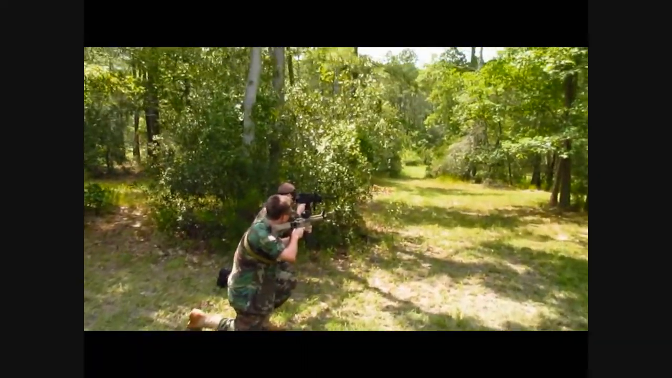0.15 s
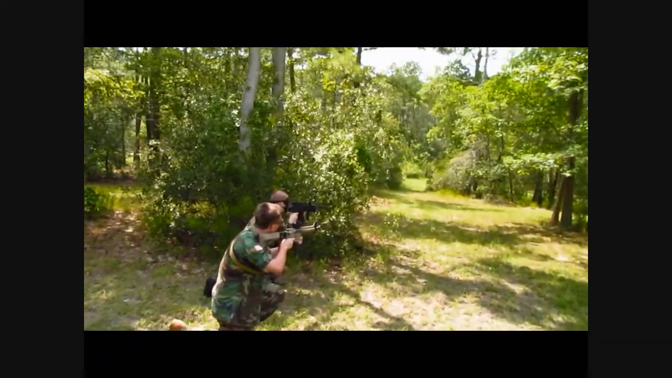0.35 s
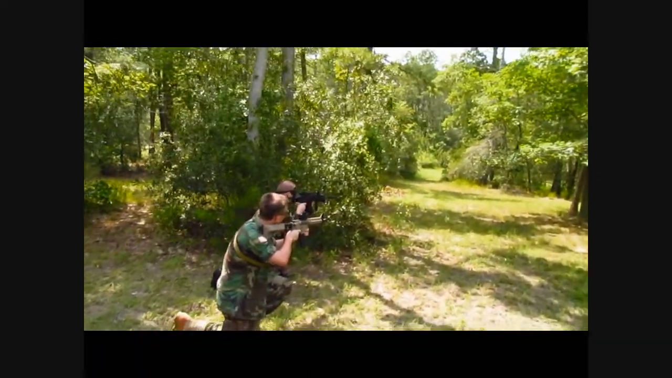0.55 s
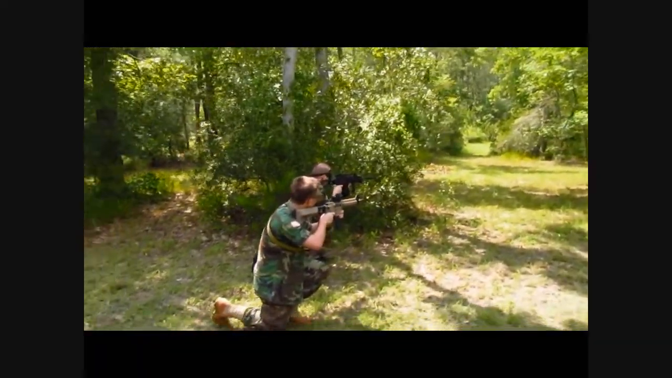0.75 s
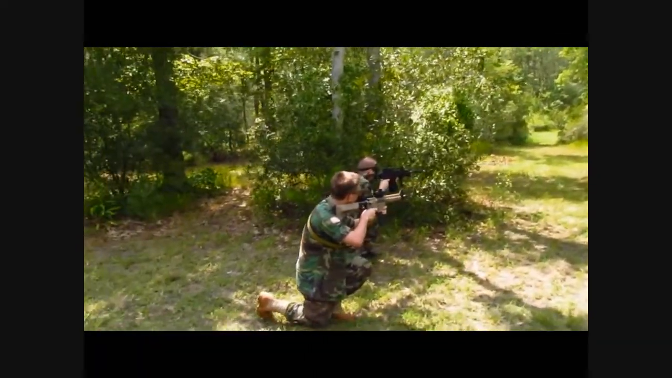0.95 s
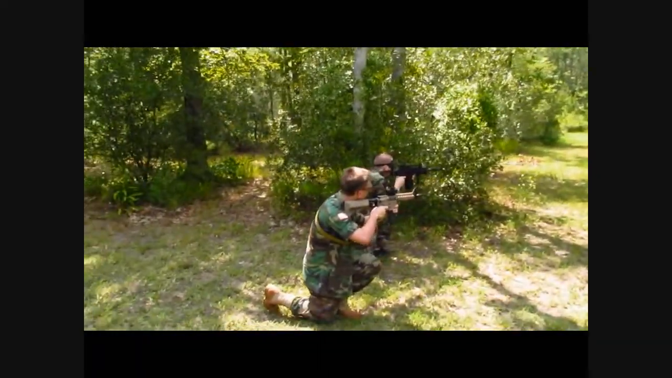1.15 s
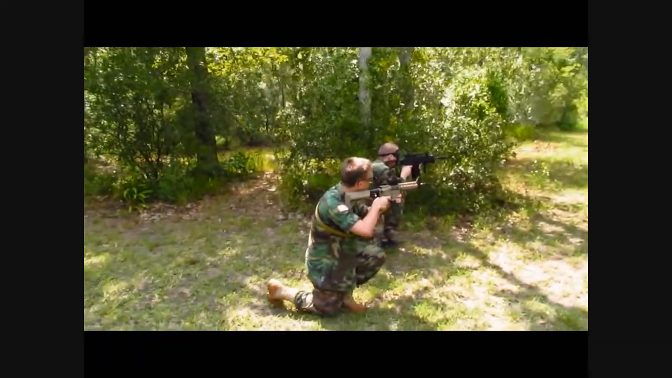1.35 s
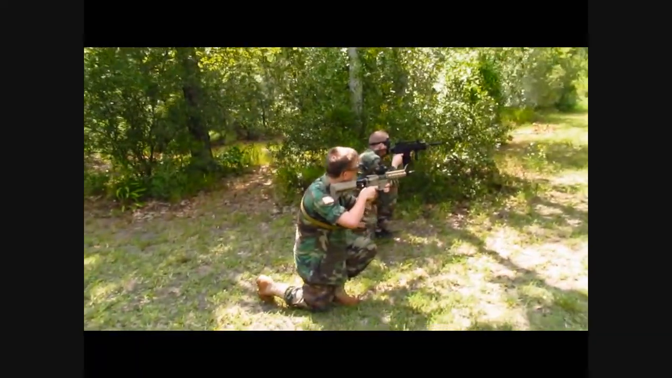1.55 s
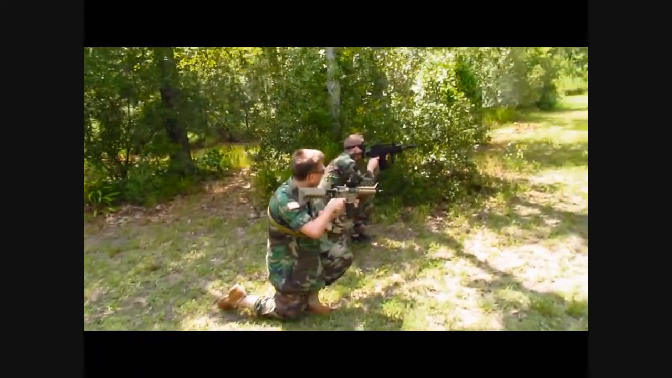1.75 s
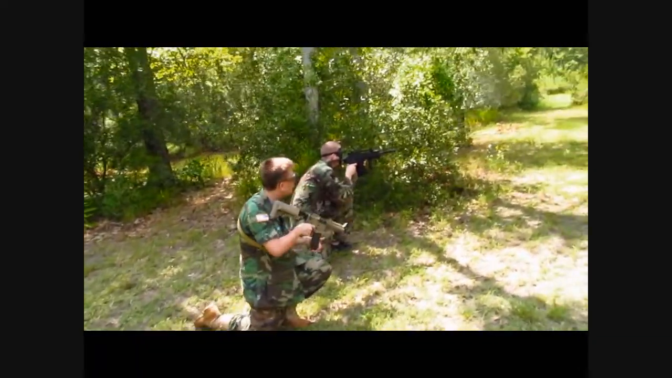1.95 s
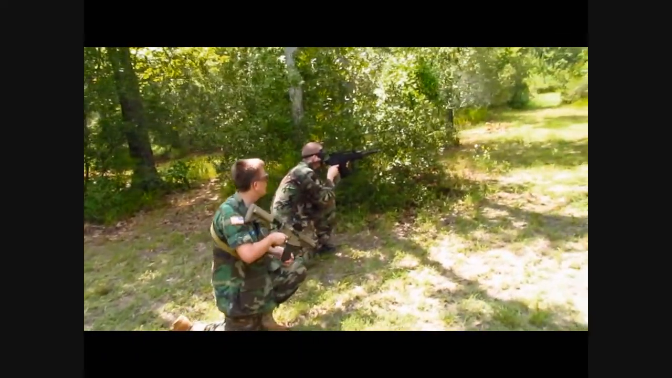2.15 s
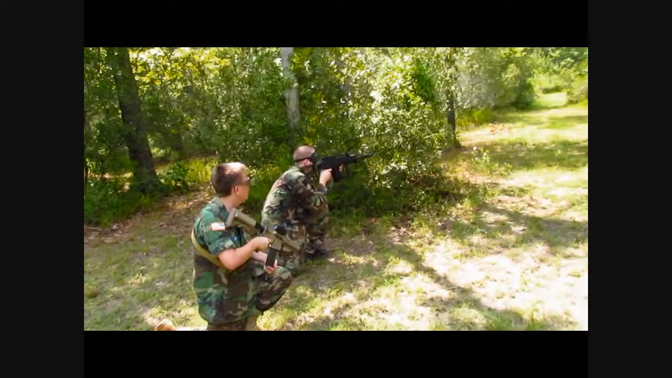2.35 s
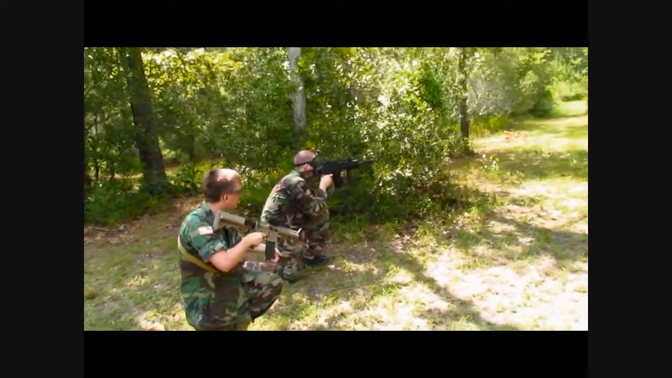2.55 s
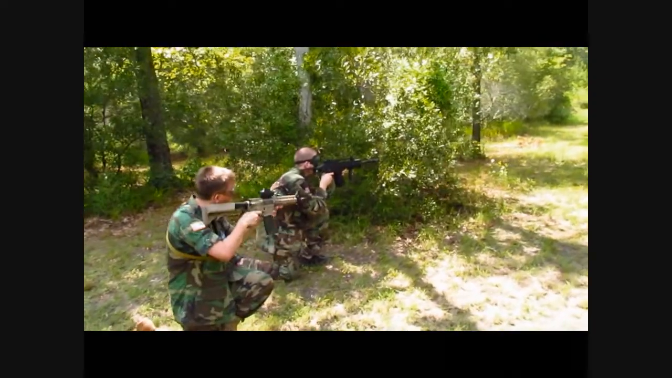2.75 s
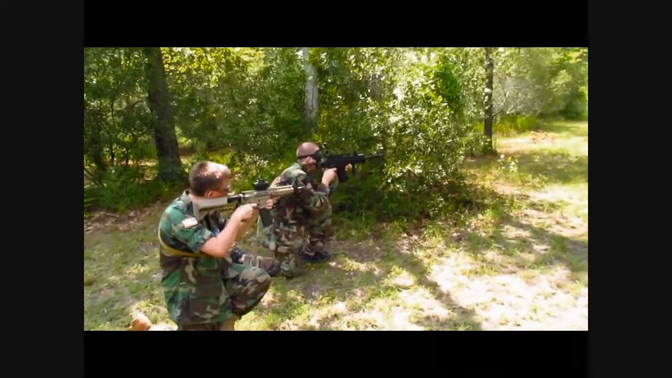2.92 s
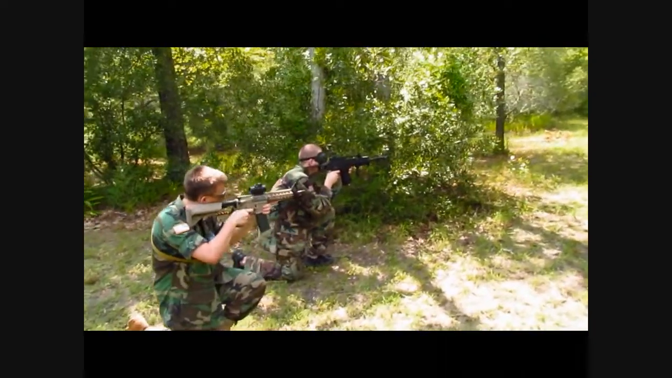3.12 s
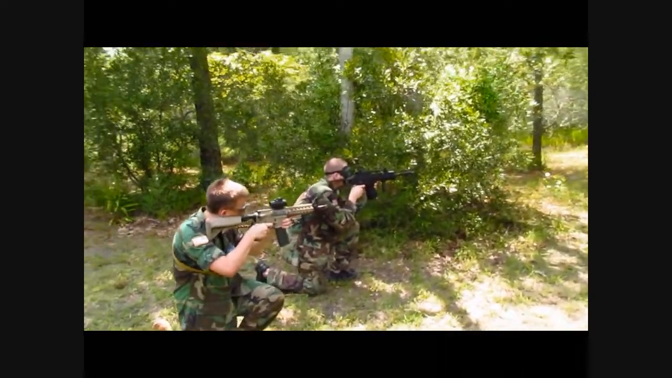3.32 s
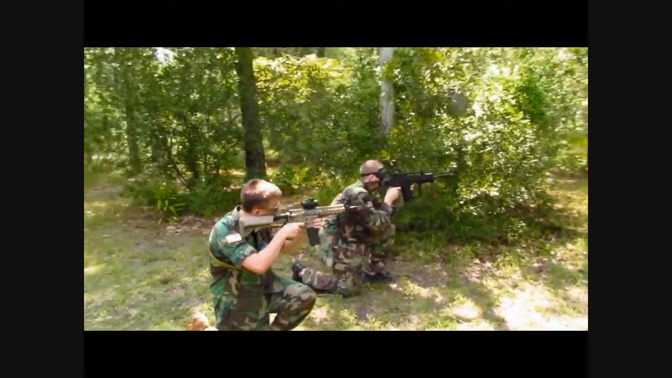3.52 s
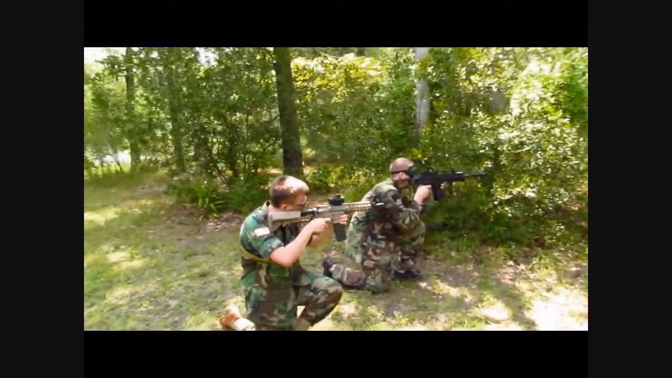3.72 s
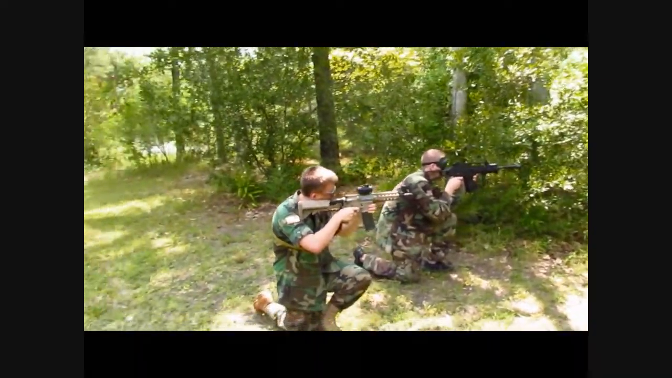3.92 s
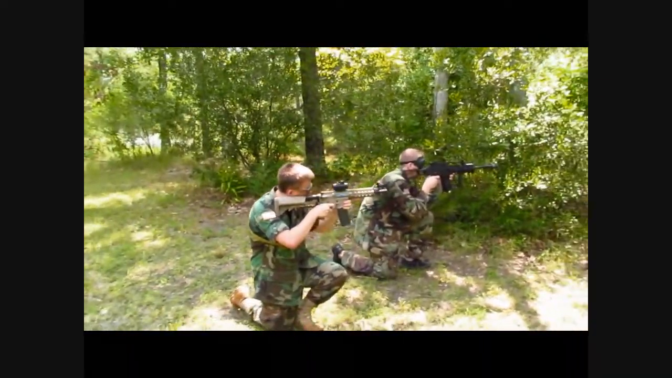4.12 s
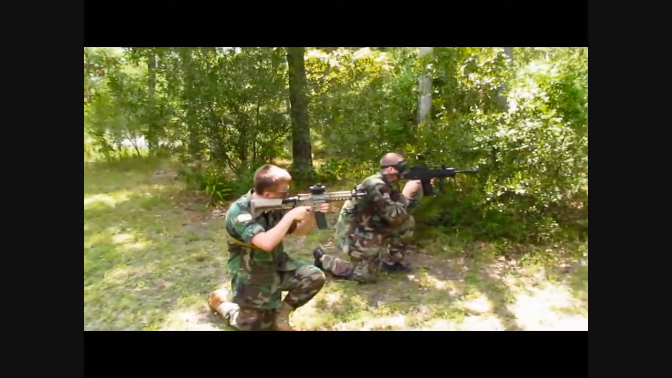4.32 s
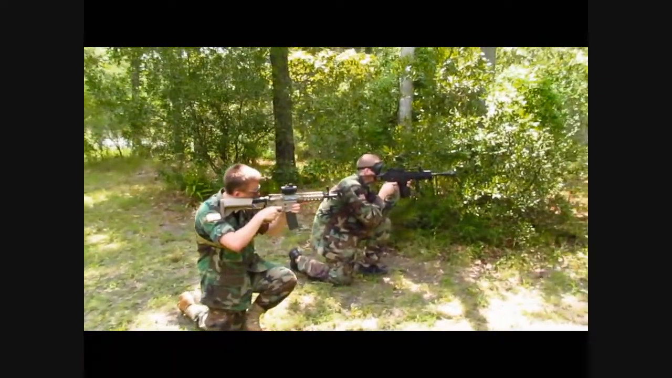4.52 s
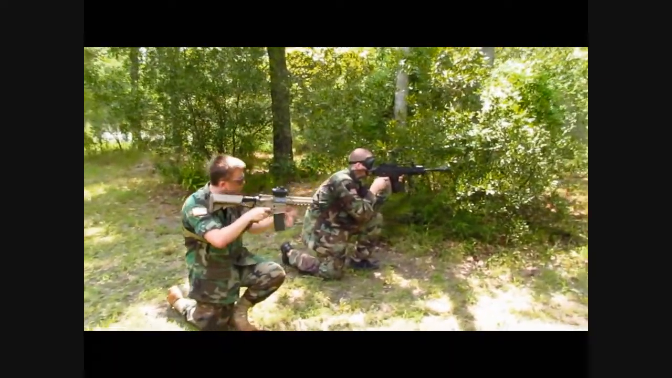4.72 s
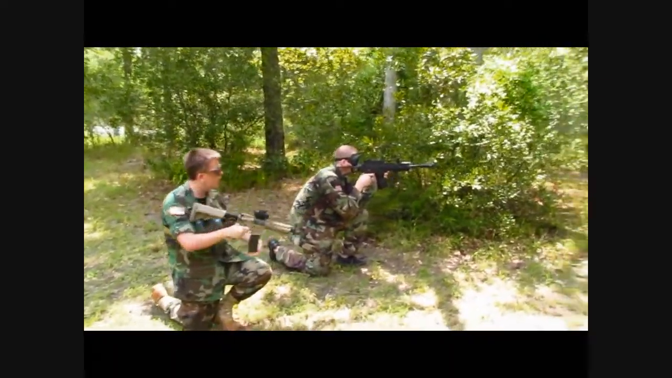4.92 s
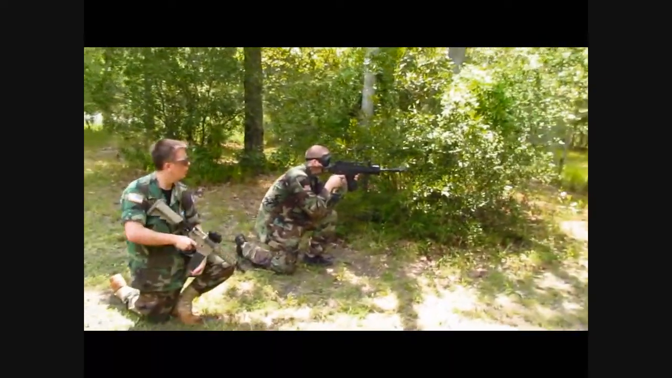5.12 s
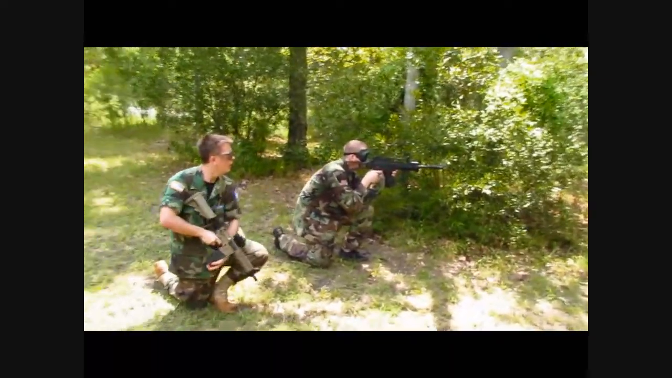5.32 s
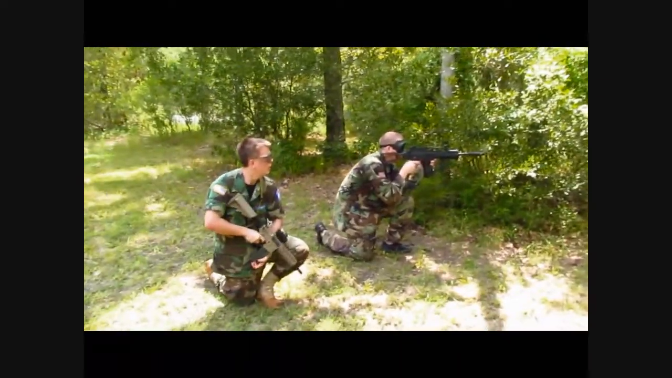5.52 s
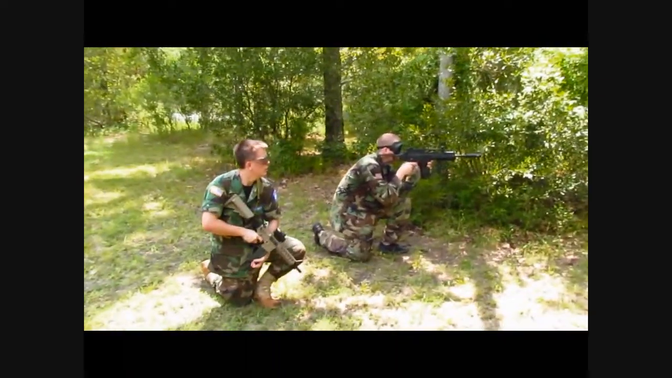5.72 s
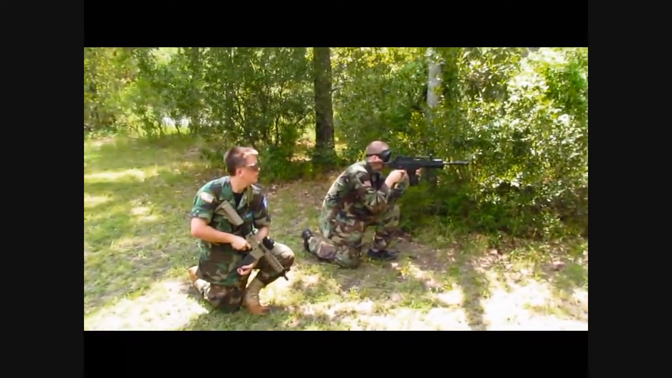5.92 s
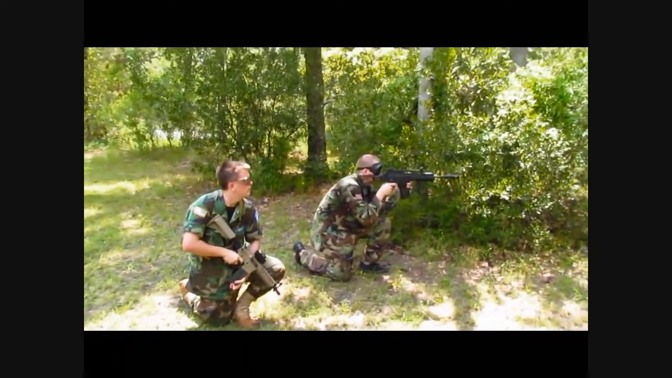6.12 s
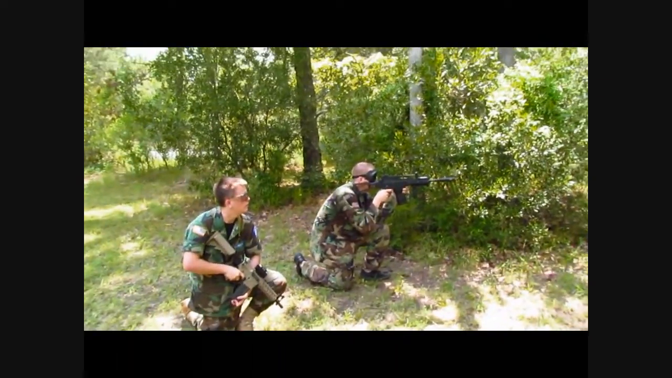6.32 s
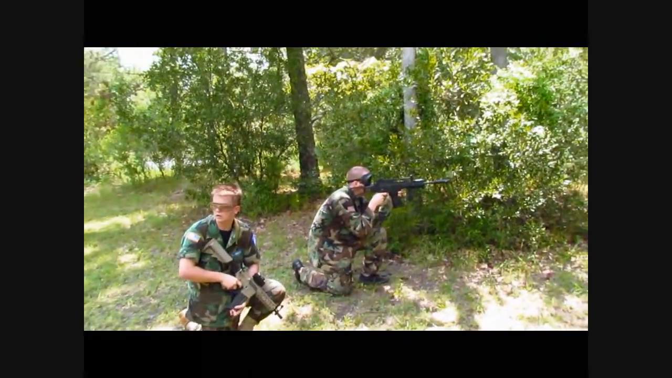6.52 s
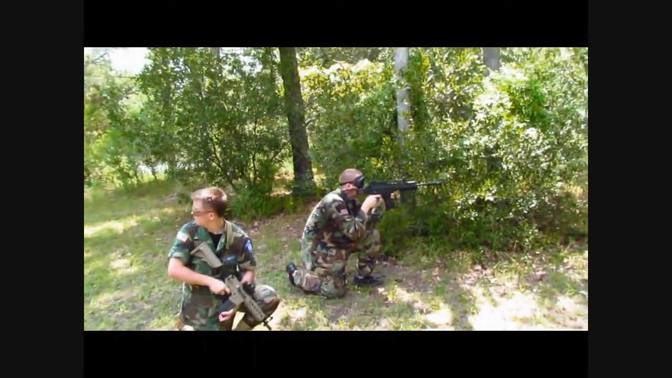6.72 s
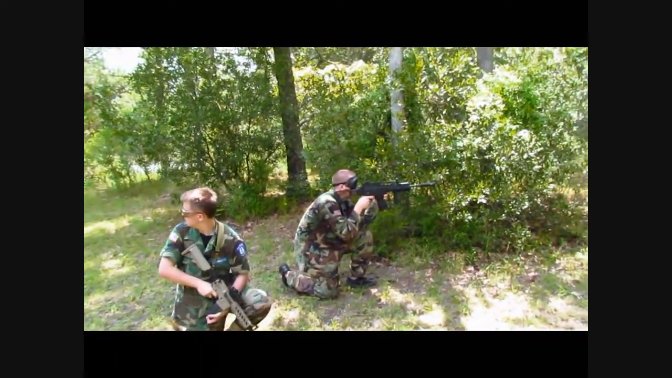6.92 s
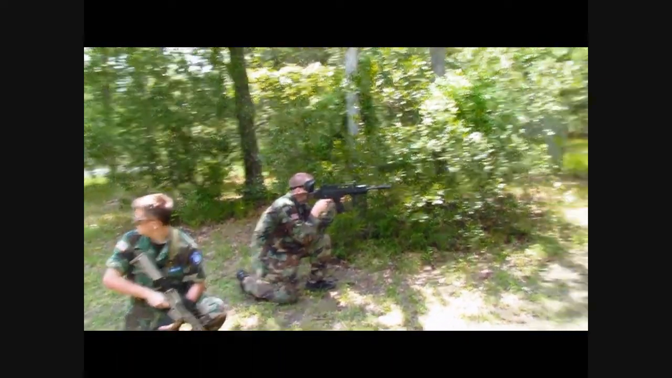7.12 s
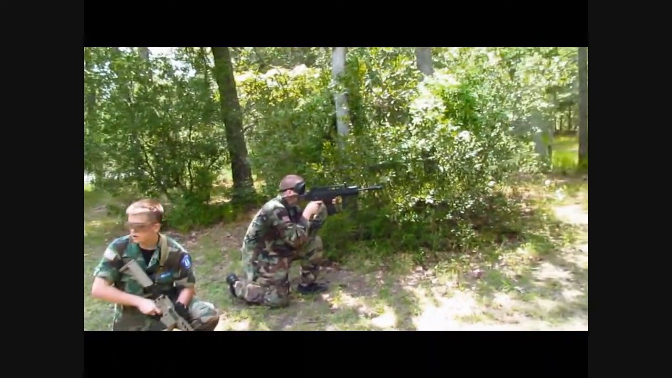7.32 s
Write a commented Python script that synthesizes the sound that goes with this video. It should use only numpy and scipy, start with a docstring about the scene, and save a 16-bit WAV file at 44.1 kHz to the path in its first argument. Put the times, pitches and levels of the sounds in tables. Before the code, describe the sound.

A close electric airsoft rifle opens with a rapid automatic burst, gears whining under the snapping shots, while a second fires single pops. A third answers with a short run from farther off. Another automatic burst follows, then spaced single shots and light ticks of handled gear. The microphone is near the shooters at the edge of a wood, with a short echo, faint leaves and a distant engine.

```python
"""The edge of a wood, with three electric airsoft rifles heard on one microphone.
Close by, one fires two automatic bursts and another fires single shots; a third answers farther off.
In each shot a gear train whines as it cocks the spring, the piston slams home and air pops from the
muzzle. The trees scatter a short echo and kit ticks as a rifle is lowered. Behind it all, leaves hiss
and an engine drones far away."""
import sys
import numpy as np
from scipy import signal
from scipy.fft import rfft, irfft, next_fast_len
from scipy.io import wavfile
from scipy.ndimage import map_coordinates

SR = 44100
rng = np.random.default_rng(int(sys.argv[2]) if len(sys.argv) > 2 else 0)


def wrap_up_sound(samples):
    """Save the sound to the file named by the first command line argument, as 16-bit audio."""
    columns = np.atleast_2d(samples).T
    # keep every value between -1 and 1, then stretch to whole-number steps
    tamed = np.clip(columns, -1, 1)
    steps = np.round(tamed * 32767).astype(np.int16)
    wavfile.write(sys.argv[1], SR, steps)


N = 324645
TOP_HZ = 10890  # upper edge of the microphone's band

# spectrum of the air leaving a muzzle: frequency_hz, level_db
POP_SPECTRUM = [(40, -21.5), (200, -24), (800, -3.5), (1500, -10), (2900, -4.5), (4100, 2), (5400, -3),
                (6800, -4.5), (10500, -6)]
# spectrum of a small hard part ticking: frequency_hz, level_db
TICK_SPECTRUM = [(100, -13), (1000, -13), (3500, -7), (7000, -2.5), (10500, -0.5)]
# spectrum of a knock on the near single-shot rifle: frequency_hz, level_db
SINGLE_CASE_SPECTRUM = [(40, -13), (300, -15.5), (700, 0), (1500, -0.5), (2400, -0.5), (4300, -11),
                        (6000, -5), (8000, 1), (10500, -5)]
# body resonances of that rifle: pitch_hz, level_db, t60_s
SINGLE_BODY_MODES = [(507, -15.5, 0.064), (643, -6.5, 0.041), (811, -5.5, 0.038), (980, -6.5, 0.04),
                     (1396, -10, 0.042), (2224, -0.5, 0.032), (3200, 1.5, 0.018), (3624, 0, 0.023),
                     (5060, 1, 0.023), (6220, -5.5, 0.04), (7600, -22.5, .03)]
# rise and fall of the background: time_s, leaves_db, engine_rumble_db
BACKGROUND_LEVELS = [(0, -69, -58), (2.6, -47, -71), (4.85, -55.5, -75), (5.25, -56.5, -73),
                     (5.7, -56.5, -68.5), (6.5, -53.5, -63), (6.85, -52, -58), (7.36, -47, -57)]


def amp(db):
    """Decibels to gain."""
    return 10 ** (np.asarray(db) / 20)


def unit(x):
    """Scale to rms 1."""
    return x / np.sqrt(np.mean(x ** 2) + 1e-20)


def ease(u):
    """A smooth step from 0 to 1 as u goes from 0 to 1."""
    return np.sin(np.pi / 2 * np.clip(u, 0, 1)) ** 2


def along(points, hz):
    """Read (frequency_hz, value) points at hz, on a log axis."""
    knots_hz, values = np.transpose(points)
    return np.interp(np.log(hz + 1), np.log(knots_hz + 1), values)


def curves(rows, t):
    """Each column after the first, read at times t."""
    times, *columns = np.transpose(rows)
    return [np.interp(t, times, column) for column in columns]


def add(track, start_s, sound):
    """Mix a sound into the track from start_s."""
    i = round(start_s * SR)
    part = sound[max(-i, 0):max(N - i, 0)]
    track[max(i, 0):][:len(part)] += part


def wobble(rate, size):
    """A smooth random curve, rate knots a second."""
    at = np.arange(size) * rate / SR
    return map_coordinates(rng.standard_normal(int(at[-1]) + 4), [at])


def noise(spectrum, size):
    """Coloured noise of rms 1."""
    padded = next_fast_len(size)
    colour = amp(along(spectrum, np.fft.rfftfreq(padded, 1 / SR)))
    return unit(irfft(rfft(rng.standard_normal(padded)) * colour, padded)[:size])


def click(spectrum, scatter_db, spread_s=0.000254, size=1024):
    """A sharp impulse smeared by the parts it passes through; its energy is that of 1 ms at rms 1."""
    hz = np.fft.rfftfreq(size, 1 / SR)
    tint = np.interp(hz, np.linspace(0, SR / 2, num=40), rng.standard_normal(40))
    cepstrum = irfft(np.log(amp(along(spectrum, hz) + scatter_db * tint)))
    cepstrum[1:size // 2] *= 2  # minimum phase: the energy comes at the front
    cepstrum[size // 2 + 1:] = 0
    delay_s = spread_s * np.abs(wobble(91.4, size)[:len(hz)])  # each band takes its own path
    pulse = irfft(np.exp(rfft(cepstrum) - 2j * np.pi * np.cumsum(delay_s) * hz[1]))
    return pulse / np.linalg.norm(pulse) * np.sqrt(SR / 1000)


def clatter(spectrum, t60_s, rise_s, size=5000):
    """A puff of noise that swells and dies."""
    t = np.arange(size) / SR
    return noise(spectrum, size) * amp(-60 * t / t60_s) * (1 - np.exp(-t / rise_s))


def ring(modes, detune, size=5000):
    """The modes of a rifle part, struck at slightly new strengths and pitches each time."""
    t = np.arange(size) / SR
    hz, db, t60_s = np.transpose(modes)[:, :, None]
    strength, shift = rng.standard_normal((2, len(modes), 1))
    waves = np.sin(2 * np.pi * hz * (1 + detune * shift) * t)
    decays = amp(db + 1.3 * strength - 60 * t / t60_s)
    return np.sum(decays * waves, axis=0) * (1 - np.exp(-t / 0.0012))


def gear_train(tooth_hz, whine, grind, whine_db, jitter):
    """Meshing teeth whine over a grinding that pulses with each tooth; uneven teeth roughen the tone."""
    # how strongly the gearbox radiates a whine line: frequency_hz, gain_db
    gearbox_response = [(500, -38), (780, -15), (870, -0.5), (1020, -36), (1180, -4.5), (1350, 0),
                        (1550, -8.5), (1790, 6.5), (2150, 2), (2650, 0.5), (3300, -6), (4500, 2.5),
                        (8000, 0)]
    size = len(tooth_hz)
    phase = 2 * np.pi * np.cumsum(tooth_hz * (1 + jitter * wobble(500, size))) / SR
    lines = 0
    for multiple, db in whine:
        flutter_db = 2 * wobble(150, size)
        line_db = db + along(gearbox_response, multiple * tooth_hz) + flutter_db
        lines += amp(line_db) * np.sin(multiple * phase + rng.uniform(0, 2 * np.pi))
    grinding = noise(grind, size)
    tooth_pulses = unit((1 + .5 * np.cos(phase)) * amp(1.8 * wobble(350, size)))
    return grinding * tooth_pulses + amp(whine_db) * lines


def slam_times(first_s, count, period_s, spin_up_s, run_down_s):
    """A steady beat that drags as the battery tires, with optional lags at its start and end."""
    tiring_s, lag_left = .000058, .15  # per shot: added cycle time, share of spin-up lag that remains
    shot = np.arange(count - 1)
    gaps = period_s + tiring_s * shot + spin_up_s * lag_left ** shot
    gaps[-1] += run_down_s
    return first_s + np.r_[0, np.cumsum(gaps)]


def firing_cycle(times, t):
    """The spring drags the motor down until the piston is let go: tooth rate, load and mesh (0-1)."""
    pick_up, let_go, recover, take_hold = .33, .9, .09, .15  # shares of one cycle
    free_hz, sag_hz = 1366.4, 369.5  # tooth rate of free gears, and its fall under the full spring
    slams = np.r_[2 * times[0] - times[1], times, 2 * times[-1] - times[-2]]
    turn = np.interp(t, slams, np.arange(len(slams))) % 1
    squeeze = np.interp(turn, [pick_up, let_go], [0, 1])
    meshed = ease((turn - pick_up) / take_hold + 1) * ease((let_go - turn) / take_hold + .5)
    tooth_hz = free_hz - sag_hz * (squeeze + np.exp(-turn / recover))
    return tooth_hz, squeeze * meshed, meshed


def piston_rush(spectrum, thump_db, size=1764):
    """The released piston scrapes forward and kicks the stock; the slam falls at the centre."""
    # spectrum of the kick in the stock: frequency_hz, level_db
    thump_spectrum = [(25, 0.5), (110, -3.5), (230, 1.5), (420, 1.5), (900, -4.5), (4000, -58)]
    t = (np.arange(size) - size / 2) / SR
    scrape = noise(spectrum, size) * np.exp(-np.abs(t) / .002) * (t < 0)
    thump = noise(thump_spectrum, size) * np.exp(-(t / 0.0071) ** 2)
    return scrape + amp(thump_db) * thump


def burst(firing, loudness, whine, pop_delay_s, gear_db, whine_db, treble_db, ring_db, rattle_db):
    """Automatic fire: the gears run on while the piston slams, the muzzle pops and the rack is caught."""
    # spectra of the grinding gears, the piston's slam and loose parts: frequency_hz, level_db
    grind_spectrum = [(40, -41), (300, -14), (550, -13.5), (850, -5), (1150, -5.5), (2800, 2.5),
                      (4100, 1.5), (4950, 0.5), (5800, -0.5), (6800, 1.5), (8000, -1), (10500, -1)]
    slam_spectrum = [(30, -12), (150, -19.5), (1300, -14.5), (1900, -12), (3050, 2), (4000, -3),
                     (5200, -14), (7400, 0), (10500, -3)]
    rattle_spectrum = [(40, -26), (250, -12.5), (750, 4), (1800, -1), (3000, 1), (5200, -2), (7000, 0),
                       (10500, -2.5)]
    # resonances of the rifle body and the cylinder head: pitch_hz, level_db, t60_s
    body_modes = [(380, -22, 0.053), (621, -17, 0.068), (777, -9.5, 0.047), (1263, -8, 0.051),
                  (1510, -11.5, 0.048), (2453, -7, 0.035), (3043, -4, 0.04), (3580, -5, 0.025),
                  (6690, -2, 0.022)]
    head_modes = [(2860, -6.5, 0.022), (3100, -8, 0.019), (3410, -7, .02)]
    t = np.arange(N) / SR
    on_s, off_s, *beat = firing
    attack_s, release_db_per_s = 0.056, 360
    times = slam_times(*beat)
    tooth_hz, load, meshed = firing_cycle(times, t)
    motor = ease((t - on_s) / attack_s) * amp(-release_db_per_s * np.maximum(t - off_s, 0))
    grind = [(hz, db + treble_db * hz / TOP_HZ) for hz, db in grind_spectrum]
    # teeth that grip the rack and bear the spring sing more and grind less
    singing_db = whine_db + 12 * meshed + 6.5 * load
    gears = gear_train(tooth_hz, whine, grind, singing_db, jitter=.012)
    out = motor * amp(curves(loudness, t)[0] + gear_db - 4.5 * load) * gears
    body = ring(body_modes, detune=0.012)  # the same case answers every shot
    loose_parts = clatter(rattle_spectrum, t60_s=0.037, rise_s=0.0013)
    for s, (slam_scatter, pop_scatter) in zip(times, rng.standard_normal((len(times), 2))):
        level_db, pop_offset_db = curves(loudness, s)
        slam_db = level_db + 0.6 * slam_scatter
        pop_db = level_db + pop_offset_db + pop_scatter + 1.3
        rush = piston_rush(slam_spectrum, thump_db=-17.5)
        add(out, s - len(rush) / SR / 2, amp(slam_db - 8.5) * rush)
        add(out, s, amp(slam_db + 3.5) * click(slam_spectrum, scatter_db=0.9))
        add(out, s, amp(slam_db - 2.5) * ring(head_modes, detune=.006))
        add(out, s + pop_delay_s, amp(pop_db) * click(POP_SPECTRUM, scatter_db=2.5))
        add(out, s, amp(ring_db) * (body + 0.33 * ring(body_modes, detune=0.032)))
        rattle = loose_parts + .5 * clatter(rattle_spectrum, t60_s=.032, rise_s=.002)
        add(out, s + pop_delay_s, amp(rattle_db) * rattle)
        catch_db = -14.5 + 2 * rng.standard_normal()
        add(out, s + .0175, amp(catch_db) * clatter(TICK_SPECTRUM, t60_s=0.01, rise_s=0.0011))
    return out


def automatic_rifle():
    """Close to the microphone, the motor drives the piston through two long bursts."""
    # timing of each burst:
    # motor_on_s, motor_off_s, first_slam_s, shot_count, period_s, spin_up_lag_s, run_down_lag_s
    first_firing = (-.1, 1.615, .0616, 21, .07525, 0, 0)
    second_firing = (3.01, 4.605, 3.077, 21, .0762, .0132, .0037)
    # loudness through each burst: time_s, level_db, pop_offset_db
    first_loudness = [(.06, -9.5, -8), (.55, -10, -8.5), (1, -12, 2), (1.58, -12, -1.5)]
    second_loudness = [(3.08, -8.5, -0.5), (3.3, -9.5, -1), (3.7, -14, -3), (4.3, -12.5, -3.5),
                       (4.63, -12, 2.5)]
    # gear whine in each burst: tooth_rate_multiple, level_db
    first_whine = [(2 / 3, -5), (1, -18), (4 / 3, -9), (2, -11), (3, -19), (4, -14), (6, -18)]
    second_whine = [(2 / 3, -6), (1, -23), (4 / 3, -18), (2, -8), (3, -19), (4, -12), (6, -15)]
    first = burst(first_firing, first_loudness, first_whine, pop_delay_s=.0024,
                  gear_db=-12.5, whine_db=-19, treble_db=3.5, ring_db=-16.5, rattle_db=-19.5)
    second = burst(second_firing, second_loudness, second_whine, pop_delay_s=.0028,
                   gear_db=-15, whine_db=-14, treble_db=-2, ring_db=-19, rattle_db=-15)
    return first + second


def distant_engine():
    """Far away, an engine drones on a wavering note above its own low rumble."""
    # the engine's note: time_s, pitch_hz, level_db
    engine_note = [(.3, 113.5, -53.5), (.6, 133, -58.5), (1, 146, -56), (1.7, 138, -66.5),
                   (2.35, 130.4, -56), (2.85, 130, -54.5), (3.1, 139, -62), (4.8, 133, -71),
                   (5.5, 132, -68), (5.8, 131, -60.5), (6.5, 131, -66), (7.36, 133, -57.5)]
    # its rumble: frequency_hz, level_db
    rumble_spectrum = [(25, -22), (52, -8), (68, -14), (80, 2.5), (92, -15), (170, -25), (208, -11),
                       (260, -21), (3000, -86)]
    t = np.arange(N) / SR
    hz, db = curves(engine_note, t)
    _, rumble_db = curves(BACKGROUND_LEVELS, t)
    phase = 2 * np.pi * np.cumsum(hz * (1 + 0.012 * wobble(9.9, N))) / SR
    drone = np.sqrt(2) * amp(db + 1.2 * wobble(6.1, N)) * np.sin(phase)
    return drone + amp(rumble_db) * noise(rumble_spectrum, N)


def leaves():
    """Leaves hiss softly, the level flickering as it swells and sinks."""
    # spectrum of the hiss: frequency_hz, level_db
    hiss_spectrum = [(25, -26), (66, -8.5), (101, -8.5), (169, -8), (241, -17), (401, -13.5), (1710, -14),
                     (2330, -18), (6280, -12.5), (10000, -19.5)]
    hiss_db, _ = curves(BACKGROUND_LEVELS, np.arange(N) / SR)
    return amp(hiss_db + 1.3 * wobble(33, N)) * noise(hiss_spectrum, N)


def tree_echo(sound, stretches=12):
    """Trunks and foliage scatter an echo; each stretch of time gets a new tail, as the shooters move."""
    # decay time of the wood: frequency_hz, t60_s
    wood_decay = [(100, 0.3), (1000, 0.36), (4000, 0.45), (10000, 0.39)]
    out = np.zeros(N)
    for part in np.array_split(np.arange(N), stretches):
        hz, t, bands = signal.stft(rng.standard_normal(SR // 2), SR, nperseg=256)
        envelope = amp(-60 * t / along(wood_decay, hz)[:, None]) * (1 - np.exp(-t / 0.013))
        _, tail = signal.istft(bands * envelope, SR, nperseg=256)
        add(out, part[0] / SR, signal.fftconvolve(sound[part], tail / np.linalg.norm(tail)))
    return out


def single_shots(shots, modes, case, grind, whine, gear_db, whine_db, crack_db, ring_db, rattle_db):
    """Semi-automatic fire: the motor spins up, the piston slams and the gears coast to rest."""
    lead_s, mesh_s, flight_s = .16, .11, .011  # before the slam: motor starts, gears sound, piston flies
    spin_up_s, half_speed_s = .133, .065
    swell_s, hold_s, stop_db_per_s = .059, .053, 720  # envelope of the gear noise
    out = np.zeros(N)
    t = np.arange(-SR // 8, SR // 6) / SR  # the slam falls at zero
    speed = ease((t + lead_s) / spin_up_s) / (1 + (np.maximum(t, 0) / half_speed_s) ** 2)
    motor = ease((t + mesh_s) / swell_s) * amp(-stop_db_per_s * np.maximum(t - hold_s, 0))
    # the teeth sing most at speed and under the spring's load
    singing_db = whine_db - np.where(t < -flight_s, 20 * (1 - speed), 18)
    for s, slam_db, top_tooth_hz in shots:
        gears = gear_train(top_tooth_hz * speed, whine, grind, singing_db, jitter=.019)
        add(out, s + t[0], amp(slam_db + gear_db) * motor * gears)
        rush = piston_rush(case, thump_db=-19)
        add(out, s - len(rush) / SR / 2, amp(slam_db - 4.5) * rush)
        add(out, s, amp(slam_db + crack_db) * click(case, scatter_db=2.5))
        add(out, s + .0026, amp(slam_db) * click(POP_SPECTRUM, scatter_db=2.5))
        add(out, s, amp(slam_db + ring_db) * ring(modes, detune=0.0073))
        add(out, s, amp(slam_db + rattle_db) * clatter(case, t60_s=0.046, rise_s=0.00038))
        # the latch ticks three times over the coasting gears
        for tick_s in hold_s * (np.arange(3) + rng.uniform(.5, 1, 3)) / 3:
            add(out, s + tick_s, amp(slam_db - 8.5) * clatter(case, t60_s=0.02, rise_s=.0005))
    return out


def near_rifle():
    """A second rifle close by fires single shots, its gears reaching a different speed each time."""
    # its shots: slam_s, level_db, top_tooth_rate_hz
    shots = [(0.2025, -20.5, 1297), (0.5235, -21.5, 1307), (0.794, -19.5, 1330), (1.493, -20.5, 1360),
             (1.7534, -22, 1455), (2.0644, -19, 1394), (2.3987, -17.5, 1346), (3.911, -27, 1336),
             (4.15, -26, 1330), (4.7359, -25.5, 1285), (4.9894, -21.5, 1693), (5.9038, -20, 1303),
             (6.242, -17.5, 1323), (6.664, -16, 1318), (7.1704, -13.5, 1331)]
    # its grinding gears: frequency_hz, level_db
    grind_spectrum = [(40, -21), (350, -21), (600, -0.5), (1500, 0), (2600, 3.5), (4500, -1), (8000, 0),
                      (10500, -2)]
    # its gear whine: tooth_rate_multiple, level_db
    whine = [(2 / 3, -15), (1, -5), (2, -5), (7 / 3, -13), (3, -10), (4, -13), (5, -16)]
    return single_shots(shots, SINGLE_BODY_MODES, SINGLE_CASE_SPECTRUM, grind_spectrum, whine,
                        gear_db=-15.5, whine_db=1, crack_db=3.5, ring_db=-2.5, rattle_db=2.5)


def latch_clacks():
    """After the first burst and some single shots, the gears unwind briefly and clack on the latch."""
    # the gears landing on the latch: start_s, level_db
    clacks = [(1.674, -30), (1.878, -33), (2.184, -31), (6.0286, -29.5), (6.3507, -33), (6.7819, -28.5),
              (7.2905, -27.5)]
    # the spring turning the gears back: frequency_hz, level_db
    unwind_spectrum = [(300, -27), (560, 5), (750, -5), (1100, -9), (10000, -21)]
    out = np.zeros(N)
    t = np.arange(-SR // 25, SR // 25) / SR
    for s, db in clacks:
        unwinding = noise(unwind_spectrum, len(t)) * np.exp(-(t / 0.021) ** 2)
        add(out, s + t[0] - .008, amp(db - 19) * unwinding)
        add(out, s, amp(db + 4.5) * clatter(SINGLE_CASE_SPECTRUM, t60_s=0.036, rise_s=0.00074))
        add(out, s, amp(db - 1.5) * ring(SINGLE_BODY_MODES, detune=0.045))
    return out


def gear_squeaks():
    """A gear squeaks at the top of the stroke, in a short arch of pitch."""
    # the squeaks: centre_s, peak_pitch_hz, level_db
    squeaks = [(1.727, 1460, -33), (2.043, 1376, -30.5)]
    out = np.zeros(N)
    t = np.arange(-SR // 25, SR // 25) / SR
    arch = 1 - (t / 0.112) ** 2
    envelope = np.exp(-(t / 0.02) ** 4)
    for s, hz, db in squeaks:
        add(out, s + t[0], amp(db) * envelope * np.sin(2 * np.pi * np.cumsum(hz * arch) / SR))
    return out


def far_rifle():
    """A third rifle, farther from the microphone, fires a short run of single shots."""
    # its shots: slam_s, level_db
    slams = [(1.8983, -29.5), (2.2267, -26), (2.493, -24.5), (2.731, -24), (2.9531, -24), (3.106, -18)]
    # its body resonances: pitch_hz, level_db, t60_s
    body_modes = [(197, -18, 0.042), (292, -18, 0.04), (548, -13, 0.029), (1140, -16, 0.034),
                  (2060, -11.5, 0.041), (3790, -1.5, 0.021), (4300, -3, 0.027)]
    # spectra of its knocked case and grinding gears: frequency_hz, level_db
    case_spectrum = [(40, -17), (250, -12), (900, -7.5), (2700, -8), (3900, -0.5), (5500, -1), (8000, 0.5),
                     (10500, -4)]
    grind_spectrum = [(40, -18), (400, -32), (1300, 6), (2800, -2.5), (4100, 4), (6500, 1.5), (10500, -1)]
    # its gear whine: tooth_rate_multiple, level_db
    whine = [(1, -12), (3, -3), (4, -7)]
    top_tooth_hz = 1305
    shots = [(s, db, top_tooth_hz) for s, db in slams]
    return single_shots(shots, body_modes, case_spectrum, grind_spectrum, whine,
                        gear_db=-17, whine_db=-2.5, crack_db=6, ring_db=2, rattle_db=0)


def trigger_snap(start_s=2.857, level_db=-23, pitch_hz=1990):
    """A trigger snaps back with a tick and a brief ring."""
    out = np.zeros(N)
    modes = [(pitch_hz, 0, .013), (2 * pitch_hz, -6, .012)]
    add(out, start_s, amp(level_db) * ring(modes, detune=.01))
    add(out, start_s, amp(level_db + 4.5) * clatter(TICK_SPECTRUM, t60_s=0.014, rise_s=0.00018))
    return out


def kit_ticks(faint_count=6, faint_db=-44.5):
    """Sling and trigger tick as they are handled, with fainter ticks while a rifle is lowered."""
    # the clearest ticks: start_s, level_db
    clear_ticks = [(5.508, -46), (5.543, -43.5), (5.597, -42), (5.655, -39.5), (5.682, -39.5),
                   (6.408, -38.5), (6.425, -40), (7.039, -30.5)]
    lower_from_s, lower_to_s = 5.43, 5.76
    shares = (np.arange(faint_count) + rng.random(faint_count)) / faint_count
    faint_ticks = [(lower_from_s + (lower_to_s - lower_from_s) * share, faint_db) for share in shares]
    out = np.zeros(N)
    for s, db in list(clear_ticks) + faint_ticks:
        add(out, s, amp(db + 6.5) * clatter(TICK_SPECTRUM, t60_s=0.019, rise_s=0.00037))
        add(out, s, amp(db - 11) * clatter(TICK_SPECTRUM, t60_s=.2, rise_s=.004))
    return out


def scene():
    """Three rifles over the quiet of the wood, in mono; the far one carries more echo."""
    near = automatic_rifle() + near_rifle()
    near += latch_clacks() + gear_squeaks() + trigger_snap() + kit_ticks()
    far = far_rifle()
    echo = tree_echo(amp(-15) * near + amp(-10) * far)
    return (near + far + echo + distant_engine() + leaves())[None]


def record(dry):
    """The camera's microphone rounds off the highest peaks and passes nothing above its band."""
    ceiling = .8
    limited = dry / (1 + np.abs(dry / ceiling) ** 6) ** (1 / 6)
    padded = next_fast_len(N + SR // 4)
    hz = np.fft.rfftfreq(padded, 1 / SR)
    low_pass = 1 / np.sqrt(1 + (hz / TOP_HZ) ** 220)
    return irfft(rfft(limited, padded) * low_pass, padded)[..., :N]


dry = scene()
out = record(dry)
wrap_up_sound(out)
```